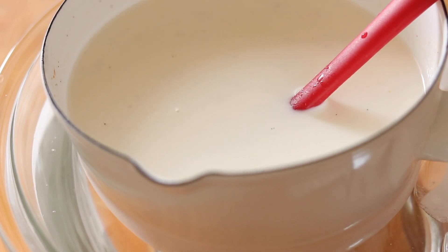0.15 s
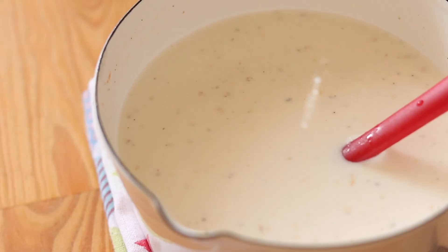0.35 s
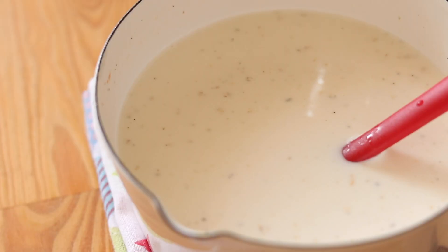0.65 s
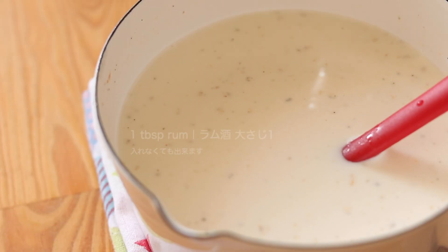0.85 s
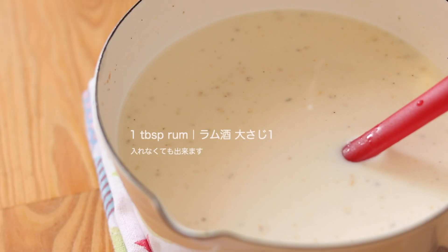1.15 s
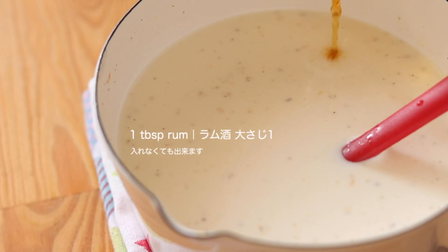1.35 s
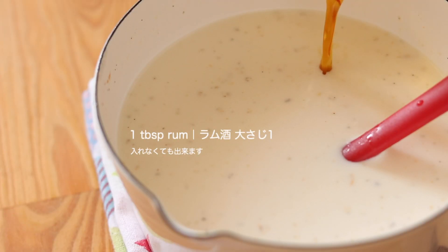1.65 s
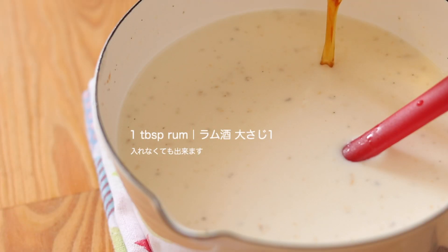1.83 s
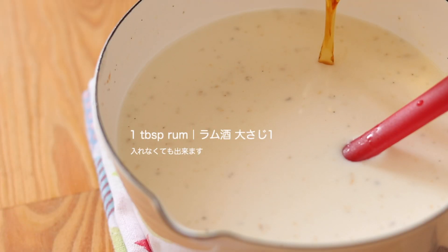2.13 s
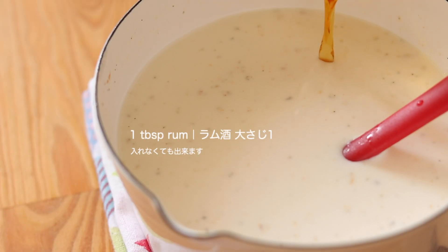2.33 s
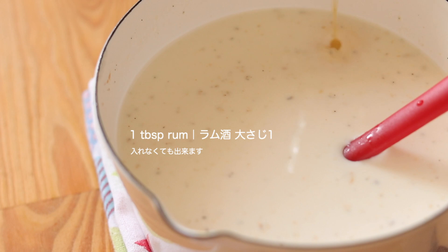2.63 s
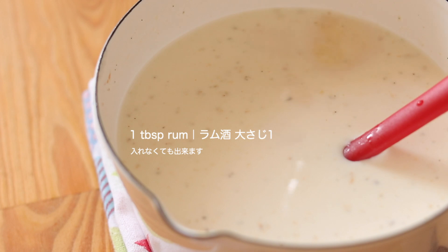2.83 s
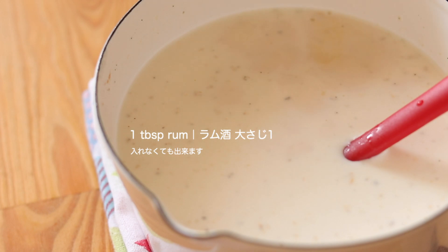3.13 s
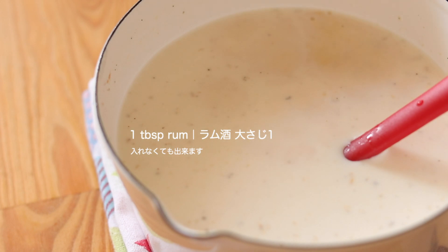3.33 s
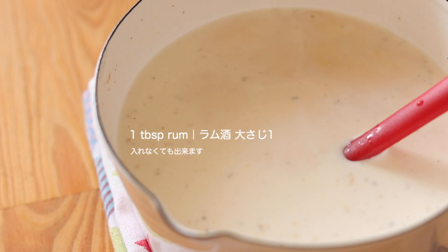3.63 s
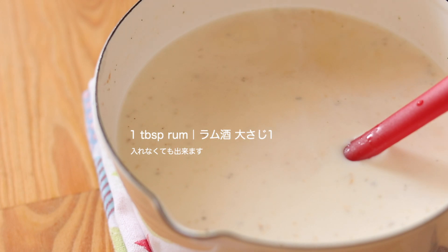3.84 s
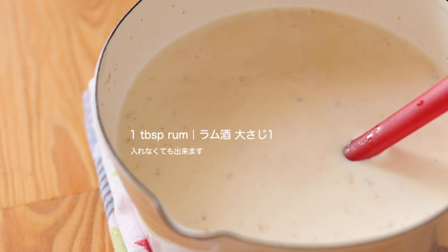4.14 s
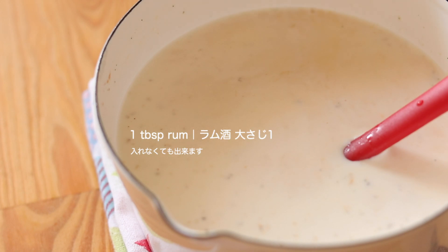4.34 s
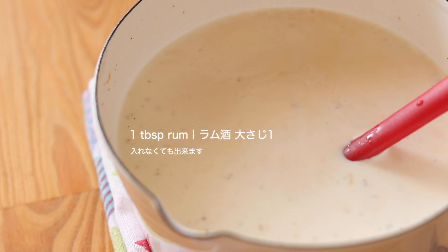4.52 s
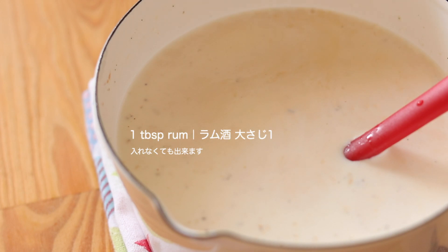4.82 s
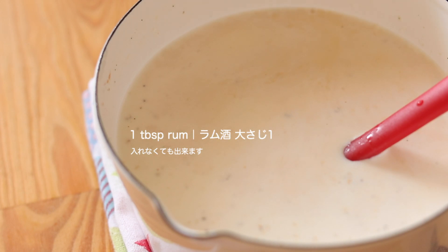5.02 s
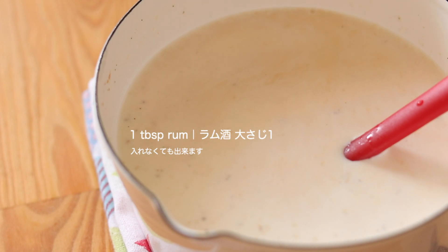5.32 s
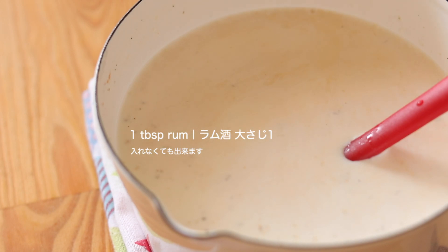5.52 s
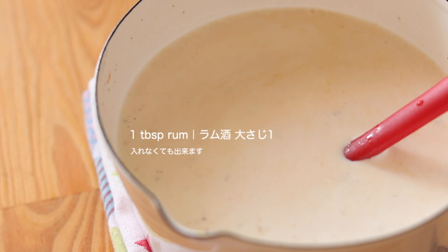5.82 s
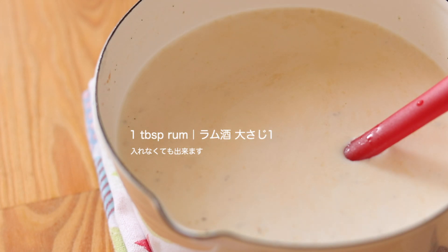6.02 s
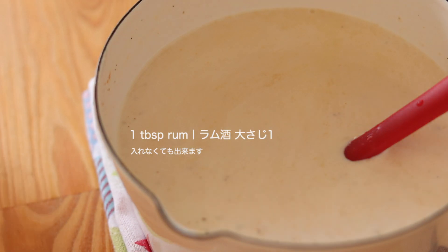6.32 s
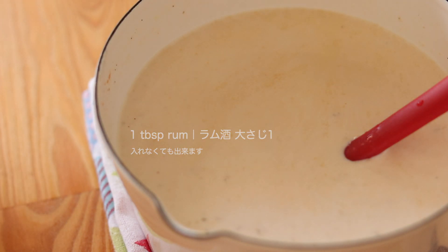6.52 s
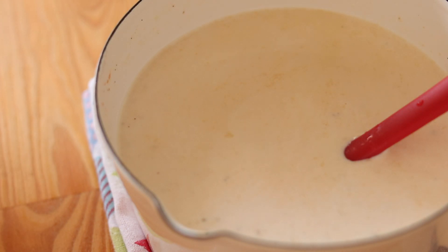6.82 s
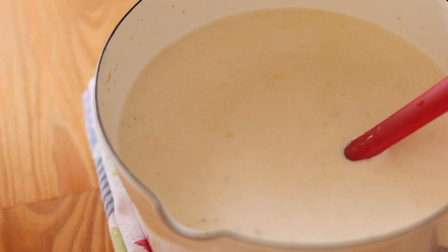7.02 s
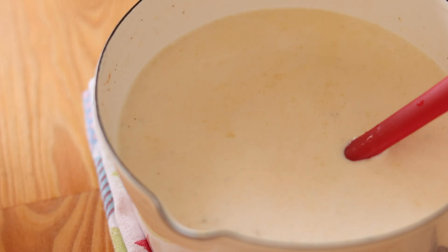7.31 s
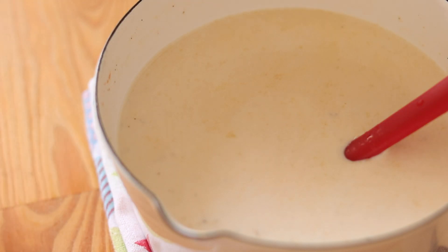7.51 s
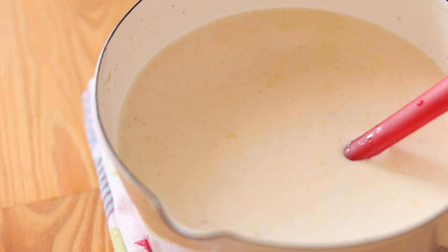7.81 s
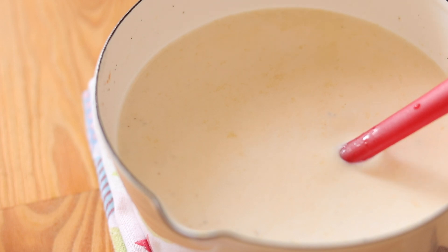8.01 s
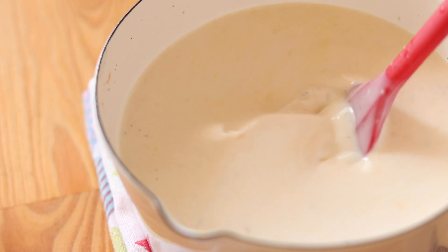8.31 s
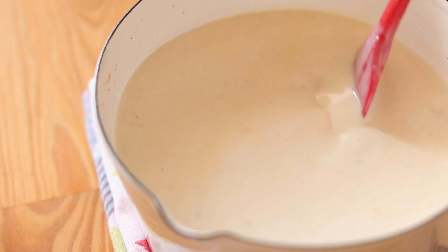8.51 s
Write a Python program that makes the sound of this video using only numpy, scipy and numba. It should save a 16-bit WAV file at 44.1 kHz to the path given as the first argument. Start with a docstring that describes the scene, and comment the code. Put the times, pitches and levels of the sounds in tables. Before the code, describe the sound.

A saucepan is knocked and drops plink, then a metal cap rasps shut on a glass bottle, which thuds onto a wooden table.

```python
"""A metal screw cap taps onto a small glass bottle and rasps shut in short twists in a quiet kitchen.
Its threads stick and slip, driving the metal, the glass and the neck air, whose tone drops as it closes.
Before that, a filled saucepan is knocked once and a few drops of rum plink into the cream, each trapping
a bubble. Handling adds faint tings. Last, a bottle is set down on the wooden table with a dull thud."""
import sys
import numpy as np
from scipy import signal
from scipy.fft import rfft, irfft
from scipy.io import wavfile
from numba import njit

SR = 44100
rng = np.random.default_rng(int(sys.argv[2]) if len(sys.argv) > 2 else 0)


def bounce(signal):
    """Save signal as a 16-bit WAV file at the path given by the first command-line argument."""
    frames = np.transpose(np.atleast_2d(signal))
    limited = np.clip(frames, -1, 1)
    pcm = np.round(limited * 32767).astype(np.int16)
    wavfile.write(sys.argv[1], SR, pcm)


N = 381685
TIME = np.arange(N) / SR
TAIL = TIME[:int(.7 * SR)]  # time axis of one event


def undb(db):
    """Decibels to gain."""
    return 10 ** (np.asarray(db) / 20)


def unit(x):
    """Scale to unit energy."""
    return x / np.sqrt(np.sum(x ** 2, axis=-1, keepdims=True))


def highpass(x, order, cutoff_hz):
    """Butterworth high-pass."""
    return signal.sosfilt(signal.butter(order, cutoff_hz, "high", fs=SR, output="sos"), x)


def colour(spectrum, size):
    """Gain per bin of a (freq_hz, level_db) curve, falling steeply past its ends."""
    hz, db = np.transpose(spectrum)
    log_hz = np.log(np.maximum(np.fft.rfftfreq(size, 1 / SR), 1))
    outside = np.abs(log_hz - np.clip(log_hz, np.log(hz[0]), np.log(hz[-1])))
    return undb(np.interp(log_hz, np.log(hz), db) - np.minimum(40 * outside, 50))


def click(spectrum, size=4096):
    """Minimum-phase click with this spectrum, unit energy."""
    cepstrum = irfft(np.log(colour(spectrum, size)))
    cepstrum[1:size // 2] *= 2
    cepstrum[size // 2 + 1:] = 0
    return unit(irfft(np.exp(rfft(cepstrum))))


def through(x, response):
    """Convolve with a mono or stereo response."""
    return signal.fftconvolve(np.atleast_2d(x), np.atleast_2d(response), axes=1)[:, :N]


def add(track, start_s, sound):
    """Mix a sound into a track."""
    i = int(start_s * SR)
    track[..., i:i + sound.shape[-1]] += sound[..., :N - i]


def place(x, pan_db, delay_samples=0):
    """Pan by left-minus-right level and delay the left side."""
    left, right = np.broadcast_to(x, (2, N))
    return np.array([np.roll(left, delay_samples) * undb(pan_db / 2), right * undb(-pan_db / 2)])


def fade(t60_s):
    """Exponential decay."""
    return undb(-60 * TAIL / t60_s)


def onset(attack_s):
    """Exponential rise to 1."""
    return 1 - np.exp(-TAIL / attack_s)


def ping(hz, t60_s, attack_s):
    """Damped tone with a rounded start."""
    return onset(attack_s) * fade(t60_s) * np.sin(2 * np.pi * hz * TAIL)


def ring(modes, spread_rad, t60_scale, attack_s=0.0012):
    """Decaying modes, unit energy; higher ones differ more in phase between the sides."""
    out = 0
    for hz, db, base_t60_s in modes:
        phase = spread_rad * min(hz / 1500, 1) * rng.choice([-1, 1]) * np.array([[1], [-1]])
        out = out + undb(db) * fade(base_t60_s * t60_scale) * np.sin(2 * np.pi * hz * TAIL + phase)
    return unit(out * onset(attack_s))


def chatter(t60_s):
    """Micro-impacts of random sign, dying away from level 1."""
    return rng.choice([-1., 1.], len(TAIL)) * fade(t60_s)


@njit
def bandpass(x, centre_hz, width_hz):
    """State-variable band-pass with a moving centre."""
    out, band_state, low_state = np.empty(len(x)), 0., 0.
    for i in range(len(x)):
        gain = np.tan(np.pi * centre_hz[i] / SR)
        damping = width_hz[i] / centre_hz[i]
        band = (band_state + gain * (x[i] + 1e-18 - low_state)) / (1 + gain * (gain + damping))
        band_state = 2 * band - band_state
        low_state += 2 * gain * band
        out[i] = damping * band
    return out


def cavity(drive, pitch_hz, width_ratio):
    """Air resonance with a moving pitch; keeps the level of noise."""
    width_hz = width_ratio * pitch_hz
    once = bandpass(drive, pitch_hz, width_hz)
    return bandpass(once, pitch_hz, width_hz) * np.sqrt(2 * SR / np.pi / width_hz)


def kitchen(x, wet_db, t60_s, mono_below_hz=600):
    """Direct sound plus a short diffuse tail, its bass alike on both sides."""
    mid, side = rng.standard_normal((2, len(TAIL)))
    side = highpass(side, 1, mono_below_hz)
    tail = np.array([mid + side, mid - side]) * fade(t60_s) * onset(0.00089)
    return x + undb(wet_db) * through(x, unit(tail))


# Room noise: freq_hz, relative_db
ROOM_SPECTRUM = [(8.8, -23.5), (15, 2), (32, -5), (50, -8.5), (123, -10.5), (159, -8), (226, -12.5),
                 (294, -12.5), (330, -11), (483, -12), (628, -18.5), (1550, -21.5), (4980, -30.5),
                 (10000, -28), (16000, -38)]


def room_tone(mid_db=-63, bass_width=0.53, wide_hz=1500):
    """Steady faint hiss and rumble, narrower in the bass."""
    mid, side = rfft(rng.standard_normal((2, N))) * colour(ROOM_SPECTRUM, N)
    width = np.interp(np.fft.rfftfreq(N, 1 / SR), [0, wide_hz], [bass_width, 1])
    mid, side = irfft(mid, N), irfft(side * width, N)
    return place(np.array([mid + side, mid - side]) * undb(mid_db) / mid.std(), pan_db=1.0)


# Handled glass and metal: start_s, pitch_hz, level_db, t60_s
HANDLING_TINGS = [(0.202, 6760, -54.5, 0.17), (2.646, 4600, -49, 0.091), (5.194, 3700, -52.5, 0.16),
                  (5.195, 10340, -60, 0.13), (5.232, 4860, -67, .11), (5.457, 9600, -54, 0.067),
                  (5.46, 4018, -58, 0.086), (5.705, 3666, -65, 0.28)]


def handling(rub_db=11):
    """Faint tings, each stirred by a brief rub, and a soft low bump as the last drops fall."""
    out = np.zeros(N)
    add(out, 2.575, undb(-49) * ping(118, t60_s=0.27, attack_s=0.029))
    for start_s, pitch_hz, level_db, t60_s in HANDLING_TINGS:
        rub = 0.17 * chatter(t60_s=0.12) * onset(0.0043)
        ting = signal.fftconvolve(unit(rub), ping(pitch_hz, t60_s, attack_s=0.00041))
        add(out, start_s, undb(level_db) * ting)
        add(out, start_s, undb(level_db + rub_db) * np.diff(rub))
    return kitchen(place(out, pan_db=-4.5, delay_samples=1), wet_db=-7, t60_s=0.45)


# Bubbles in the cream: start_s, pitch_hz, level_db, t60_s, relative_rise_per_s, pan_db
DROP_BUBBLES = [(1.385, 2450, -38.5, 0.031, 1.7, -6), (2.644, 4200, -31.5, 0.008, 3, -11),
                (2.6658, 2724, -33, 0.048, 31, 0), (2.689, 2480, -30.5, 0.03, 16, -2)]


def drops(rise_s=0.008):
    """Each drop traps a tiny bubble whose pitch rises as it nears the surface."""
    out = np.zeros((2, N))
    for start_s, pitch_hz, level_db, t60_s, rise_per_s, pan_db in DROP_BUBBLES:
        glide_hz = pitch_hz * (1 + rise_per_s * np.minimum(TAIL, rise_s))
        envelope = undb(level_db) * fade(t60_s) * onset(0.00052)
        plink = envelope * np.sin(2 * np.pi * np.cumsum(glide_hz) / SR)
        add(out, start_s, undb([[pan_db / 2], [-pan_db / 2]]) * plink)
    return kitchen(out, wet_db=-7, t60_s=0.27)


# Saucepan ring: pitch_hz, relative_db, base_t60_s
SAUCEPAN_MODES = [(450, -16.5, 0.57), (505, -15.5, 0.66), (678, -4.5, 0.44), (1260, -14, 0.45),
                  (1400, -9, 0.22), (1905, 1.5, 0.39), (2137, -0.5, 0.15), (2330, -22, 0.42),
                  (2767, -31, .55), (3140, -16, 0.25), (3450, -21, 0.34), (3537, -16, 0.37),
                  (3595, -22, 0.3), (3900, -18, 0.29), (6900, -27, 0.43)]
# Blow on the saucepan: freq_hz, relative_db
KNOCK_SPECTRUM = [(150, -86), (250, -31), (597, -8.5), (663, -8.5), (830, -19), (1260, -10.5), (1630, -15),
                  (1920, -9), (2520, -52), (3500, -30), (4070, -25), (4380, -50), (9000, -56), (11700, -53),
                  (19800, -120)]


def saucepan(start_s=0.9031):
    """One firm knock; the cream damps the ring quickly."""
    force = np.zeros(N)
    add(force, start_s, np.ones(1))
    crack = undb(-5) * through(force, click(KNOCK_SPECTRUM))
    ringing = undb(1) * through(force, ring(SAUCEPAN_MODES, spread_rad=0.54, t60_scale=0.6))
    crack = kitchen(place(crack, pan_db=2.0), wet_db=4.5, t60_s=0.28)
    return crack + kitchen(place(ringing, pan_db=-1.5), wet_db=-4.5, t60_s=0.27)


# Bottle base hitting the wood: start_s, level_db
LANDING_HITS = [(6.943, -0.5), (6.9633, 2.5)]
# Blow on the wood: freq_hz, relative_db
THUD_SPECTRUM = [(50, -39.5), (90, -46.5), (130, -8.5), (200, 5.5), (400, -2), (520, -8.5), (900, -13),
                 (1000, -21), (1170, -12.5), (1600, -34.5), (1950, -27), (2500, -35.5), (3300, -49),
                 (4500, -61.5)]
# Table top ring: pitch_hz, relative_db, base_t60_s
TABLE_MODES = [(157.3, -8, 0.56), (200.2, 7, 0.36), (226, -9, 0.46), (274, -29, 0.44), (324, -11.5, 0.41),
               (330, -6, 0.24), (377, -2.5, 0.37), (388, -6, 0.33), (458, -12, 0.47), (447, -24.5, 0.2),
               (570, -9, 0.27), (590, -15, 0.39), (649, -14, 0.26), (705, -25, 0.22), (810, -10.5, 0.17),
               (895, -11, 0.3), (1105, -18.5, 0.26), (1168, -21, 0.32), (1886, -29, .22),
               (2440, -26.5, .15)]


def bottle_on_table():
    """The bottle lands and rocks flat: two thumps, the first setting the table top ringing."""
    both_hits, first_hit = np.zeros((2, N))
    for start_s, level_db in LANDING_HITS:
        add(both_hits, start_s, undb([level_db]))
    add(first_hit, LANDING_HITS[0][0], np.ones(1))
    thump = undb(-10.5) * ping(166.8, t60_s=0.075, attack_s=0.0071)
    thump = highpass(thump, 2, cutoff_hz=135)  # little radiates below the lowest mode
    blow = undb(-8) * through(both_hits, click(THUD_SPECTRUM))
    blow = kitchen(place(blow, pan_db=-1), wet_db=12.5, t60_s=0.27, mono_below_hz=1200)
    boom = undb(9) * through(first_hit, ring(TABLE_MODES, spread_rad=0.3, t60_scale=0.88, attack_s=0.0024))
    return place(through(both_hits, thump) + blow + boom, pan_db=1.4)


# Cap knocking on the glass: start_s, ping_hz, ping_db, clack_db, tick_db, thump_db
CAP_KNOCKS = [ (3.547, 2130, -14, -35.5, -45, -58), (3.5705, 2026, -10, -27.5, -31.5, -50),
              (3.5833, 1780, -13.5, -32.5, -30.5, -63), (3.917, 1600, -27.5, -41, -34.5, -34),
              (4.017, 2590, -27, -41, -37, -38), (4.0295, 1800, -37, -25.5, -15, -37),
              (4.074, 1664, -17, -26.5, -57, -34), (4.228, 1760, -12.5, -35, -18.5, -27),
              (4.241, 1750, -21.5, -22.5, -24, -19.5), (4.283, 3640, -15.5, -31.5, -33, -33),
              (4.332, 1770, -18.5, -40.5, -37, -30), (4.36, 2430, -25, -38.5, -29, -32.5),
              (4.385, 1830, -16, -22.5, -25, -30.5), (4.564, 1950, -18, -18.5, -39.5, -31.5),
              (4.5784, 1750, -23, -14, -15, -56.5), (4.58, 1690, -4.5, -38.5, -15, -8.5),
              (4.607, 1810, -15.5, -49, -36.5, -27.5), (4.688, 1820, -19, -30, -26.5, -39),
              (4.764, 1850, -28, -27.5, -24, -60), (4.8168, 3800, -26, -11, -15, -43),
              (4.874, 2500, -12, -20.5, -25, -40), (4.939, 2470, -32, -26, -34, -43)]


def cap_knocks():
    """Each knock gives a ping, a thump and brief chatter that drives a clack and a treble tick."""
    pings, clack, thumps = np.zeros((3, N))
    tick = np.zeros((2, N))
    for start_s, ping_hz, ping_db, clack_db, tick_db, thump_db in CAP_KNOCKS:
        add(pings, start_s, undb(ping_db) * ping(ping_hz, t60_s=0.015, attack_s=0.0015))
        add(clack, start_s, undb(clack_db) * chatter(t60_s=0.023))
        shared, left, right = (chatter(t60_s=0.022) for _ in range(3))
        add(tick, start_s, undb(tick_db) * (shared + undb(-3.5) * np.array([left, right])))
        add(thumps, start_s, undb(thump_db) * ping(280, t60_s=0.021, attack_s=0.0027))
    return pings, clack, tick, highpass(thumps, 3, cutoff_hz=150)


def waver(per_s, depth_db):
    """Randomly wandering gain."""
    knots = rng.standard_normal(N // 50)
    return undb(depth_db * np.interp(TIME * per_s, np.arange(len(knots)), knots))


def friction(per_s, scatter_db):
    """Stick and slip: dense tiny impacts of uneven size, rms 1."""
    slips = (rng.random(N) < per_s / SR) * rng.choice([-1, 1], N)
    slips = slips * undb(scatter_db * np.minimum(rng.exponential(size=N), 4))
    return slips / slips.std()


def catches(per_s):
    """Threads catch and let go at uneven intervals, each time with a brief chatter; rms 1."""
    times_s = np.cumsum(rng.uniform(0.4, 1.6, N // 200)) / per_s
    force = np.zeros(N)
    force[(times_s[times_s < TIME[-1]] * SR).astype(int)] = 1
    grit = through(force, fade(t60_s=0.017))[0] * rng.choice([-1., 1.], N)
    return grit / grit.std()


def twist(start_s, length_s, swell_db, arch_db, attack_s=0.1, release_s=0.12):
    """Envelope of one twist: tilted by swell_db, its middle raised over its ends by arch_db."""
    along = np.clip((TIME - start_s) / length_s, 0, 1) - 0.5
    before = np.maximum(start_s - TIME, 0) / attack_s
    after = np.maximum(TIME - start_s - length_s, 0) / release_s
    return undb(swell_db * along - arch_db * (2 * along) ** 2 - 60 * np.minimum(before + after, 2))


# Twists of the cap; gap = air resonance under it: start_s, length_s, rasp_db, hiss_db, neck_db,
# glass_db, swell_db, brighten_db, gap_from_hz, gap_to_hz, gap_db
CAP_TWISTS = [(3.793, 0.08, -65, -72.5, -44, -61, 3.5, 12, 1950, 1910, -48),
              (3.874, 0.1, -50.5, -54.5, -50, -49, -3, 4, 1660, 1390, -46),
              (4.021, 0.12, -57.5, -67, -55, -49.5, -5, -16, 1554, 1580, -56.5),
              (4.144, .055, -38.5, -42, -42.5, -41.5, 7, 6, 1640, 1730, -51.5),
              (4.215, 0.18, -40, -42.5, -35, -33.5, -7, 2.5, 1760, 1780, -44.5),
              (4.492, 0.074, -33.5, -38, -67, -44.5, -0.5, 14.5, 1450, 1119, -41),
              (4.593, 0.13, -38, -36.5, -35, -45.5, 1.5, 9, 1758, 1920, -39),
              (4.749, 0.051, -52, -53.5, -53, -53, 3, -3, 1850, 1860, -48.5),
              (4.828, 0.11, -35, -35, -54, -42, 2.5, 6, 1927, 1900, -74.5),
              (4.975, 0.088, -62.5, -66, -63.5, -62, -1.5, 0, 2800, 2930, -52.5)]


def cap_threads(seated):
    """Thread friction: drives for the metal, neck air and glass, plus the resonance under the cap."""
    rasp, hiss, neck_drive, glass_drive, gap_tone = np.zeros((5, N))
    grip = waver(per_s=89, depth_db=4.0)
    grit = undb(-9) * catches(per_s=35)
    slips = grip * (friction(per_s=1800, scatter_db=1) + grit)
    for (start_s, length_s, rasp_db, hiss_db, neck_db, glass_db,
         swell_db, brighten_db, gap_from_hz, gap_to_hz, gap_db) in CAP_TWISTS:
        effort = twist(start_s, length_s, swell_db, arch_db=3)
        rasp += undb(rasp_db) * effort
        glass_drive += undb(glass_db) * effort
        hiss += undb(hiss_db) * twist(start_s, length_s, swell_db + brighten_db, arch_db=8)
        neck_drive += undb(neck_db) * twist(start_s, length_s, swell_db - brighten_db / 2, arch_db=7.5)
        gap_hz = np.interp(TIME, [start_s, start_s + length_s], [gap_from_hz, gap_to_hz])
        gap_tone += cavity(undb(gap_db) * effort * slips, gap_hz, width_ratio=0.17 + 0.3 * seated)
    # each side of the cap adds its own grains
    shared, left, right = (friction(per_s=2700, scatter_db=5.0) for _ in range(3))
    hiss = hiss * grip * (1.1 * shared + grit + np.array([left, right]))
    neck_drive *= friction(per_s=1500, scatter_db=3.0)
    return rasp * slips, hiss, neck_drive, glass_drive * slips, gap_tone


# Air in the bottle as the cap closes: time_s, pitch_hz
NECK_PITCH = [(3.81, 525), (3.86, 485), (3.93, 400), (4.2, 345), (4.57, 340), (4.63, 400), (4.68, 440),
              (4.76, 392)]


def neck_air(drive, seated):
    """Neck resonance, damped as the cap seats; still open at the first taps, it hums on."""
    pitch_hz = np.interp(TIME, *np.transpose(NECK_PITCH))
    air = cavity(drive, pitch_hz, width_ratio=0.11 + 0.36 * seated)
    add(air, 3.56, undb(-45.5) * ping(540, t60_s=0.36, attack_s=0.018))
    return air


# Bottle wall: pitch_hz, relative_db, base_t60_s
GLASS_MODES = [(3425, -7, .28), (3470, -15, .2), (3715, -8, .2), (3738, 0, .4), (3760, 1, .44),
               (4840, -18, .18), (4868, -18, .18)]


def bottle_glass(drive):
    """The glass rings under rubs and knocks."""
    return through(drive, ring(GLASS_MODES, spread_rad=0.6, t60_scale=0.55))


# Cap ringing on the bottle: pitch_hz, relative_db, base_t60_s
CAP_MODES = [(1300, 0.5, 0.16), (1572, -2.5, 0.21), (1710, -0.5, 0.22), (1750, 3, 0.22), (1996, -3.5, 0.23),
             (2130, -4.5, 0.19), (2270, -5, 0.45), (2366, 9.5, 0.3), (2550, -3, .1), (3100, -0.5, 0.07),
             (6080, 12, 0.18), (7770, -12, 0.16), (9200, 3.5, 0.17), (10400, -13, 0.17), (10450, 3, 0.11),
             (11600, -7, 0.18)]
# Metal clack and treble tick: freq_hz, relative_db
CLACK_SPECTRUM = [(400, -8), (750, -11.5), (1200, -10), (1750, -0.5), (2400, 0.5), (3000, 1), (3700, 4.5),
                  (4200, -8), (5200, -8)]
TICK_SPECTRUM = [(4900, -35.5), (5600, -8), (6200, 1.5), (7300, -5.5), (8300, 1), (9400, 3.5), (10700, -1),
                 (12500, -7.5), (15700, -13.5)]


def cap_metal(body_drive, treble_drive, split_hz=5300):
    """The metal answers with a clack plus its low modes, and a tick plus its high modes."""
    low_modes = [mode for mode in CAP_MODES if mode[0] < split_hz]
    high_modes = [mode for mode in CAP_MODES if mode[0] >= split_hz]
    low_ring = through(body_drive, ring(low_modes, spread_rad=0.5, t60_scale=0.8))
    high_ring = through(treble_drive, ring(high_modes, spread_rad=1.0, t60_scale=0.35))
    body = undb(-0.43) * through(body_drive, click(CLACK_SPECTRUM)) + undb(-7) * low_ring
    treble = through(treble_drive, click(TICK_SPECTRUM)) + undb(-21.5) * high_ring
    return body, treble


def screw_cap(loose_s=3.86, seated_s=4.2):
    """Threads and knocks drive the metal cap, the glass and the air in the bottle."""
    seated = np.interp(TIME, [loose_s, seated_s], [0, 1])
    rasp, hiss, neck_drive, glass_drive, gap_tone = cap_threads(seated)
    pings, clack, tick, thumps = cap_knocks()
    glass = bottle_glass(glass_drive + undb(-5.5) * clack)
    body, treble = cap_metal(clack + rasp, tick + hiss)
    lows = place(neck_air(neck_drive, seated) + thumps, pan_db=0.3, delay_samples=2)
    mids = place(body + pings + gap_tone + glass, pan_db=-3.0, delay_samples=3)
    highs = place(treble, pan_db=-3.5, delay_samples=3)
    return kitchen(lows + mids + highs, wet_db=-7.5, t60_s=0.28)


def scene():
    """Stereo mix of all sources."""
    return saucepan() + drops() + handling() + screw_cap() + bottle_on_table() + room_tone()


def record(dry):
    """Soft clip, then a steep low-pass."""
    cutoff_hz = 15900
    return signal.sosfilt(signal.ellip(10, 0.1, 70, cutoff_hz, fs=SR, output="sos"), np.tanh(dry))


dry = scene()
out = record(dry)
bounce(out)
```